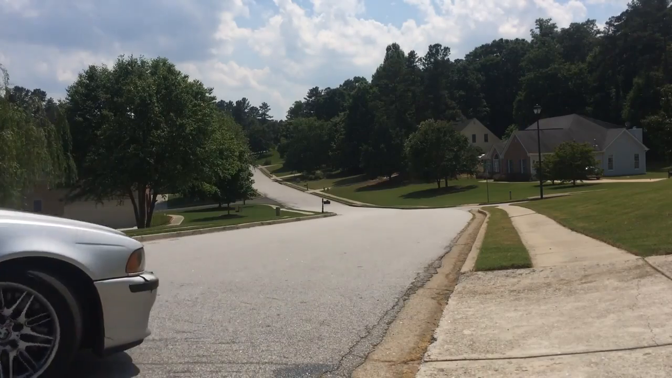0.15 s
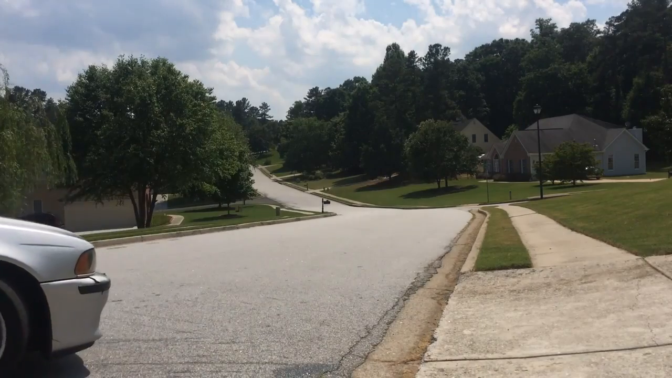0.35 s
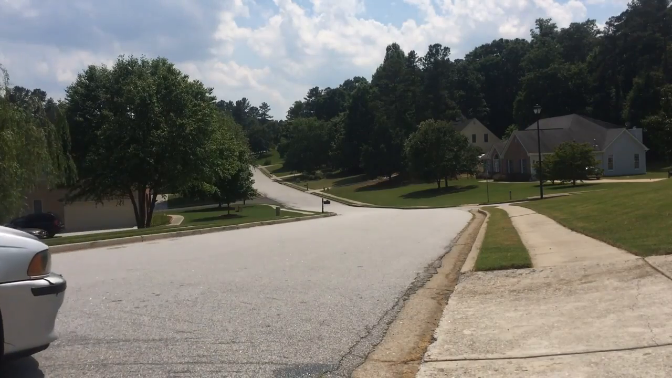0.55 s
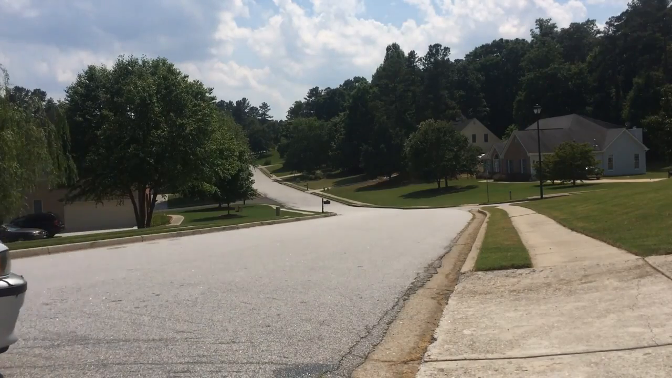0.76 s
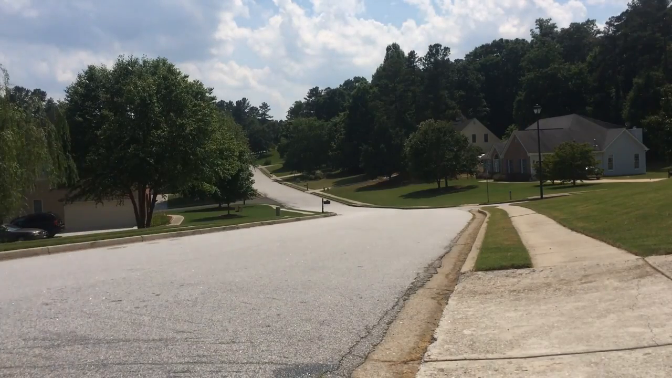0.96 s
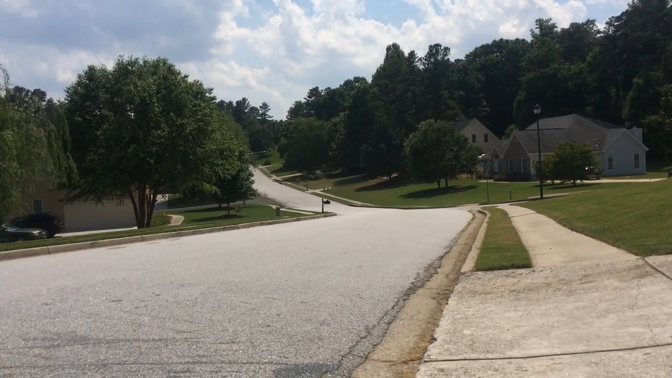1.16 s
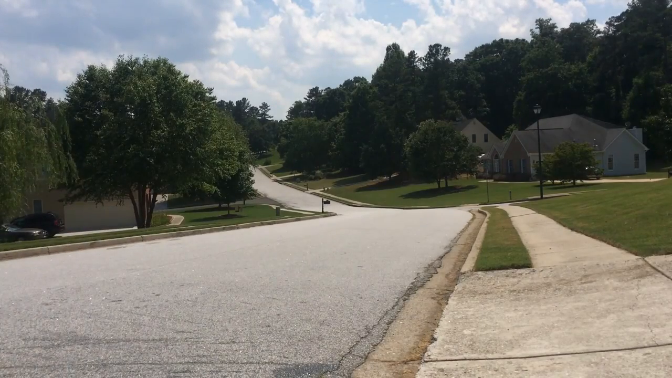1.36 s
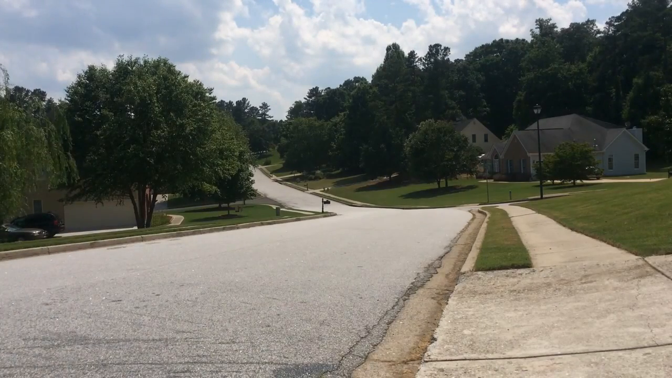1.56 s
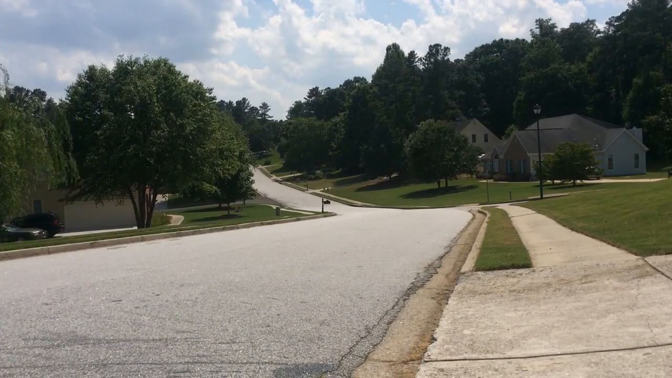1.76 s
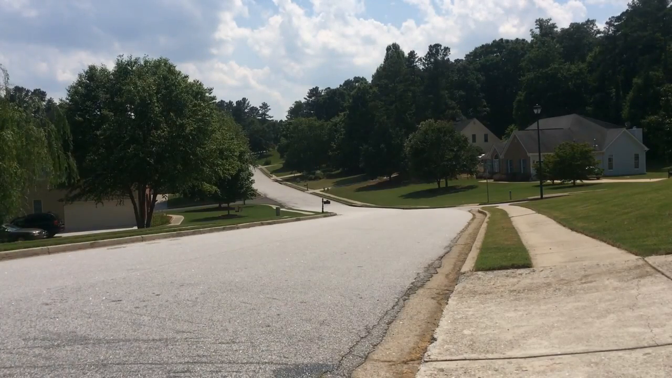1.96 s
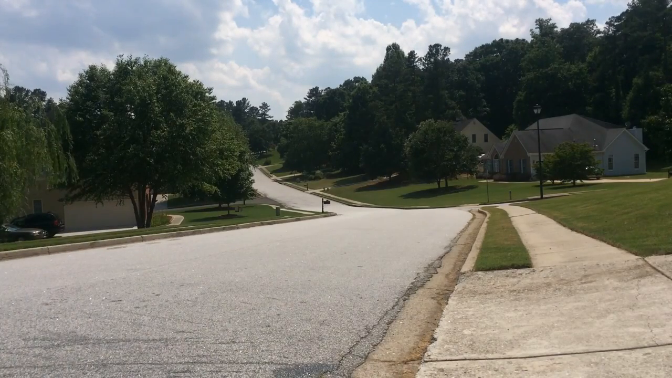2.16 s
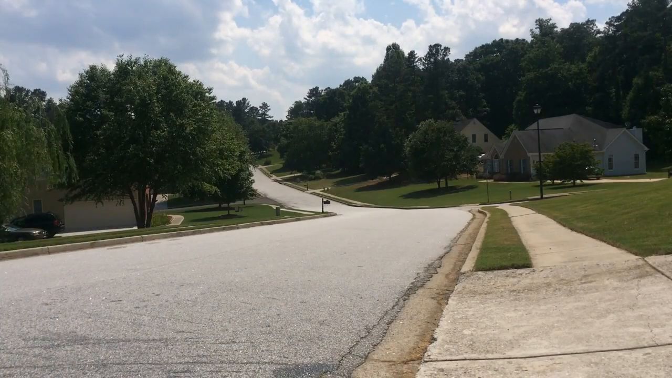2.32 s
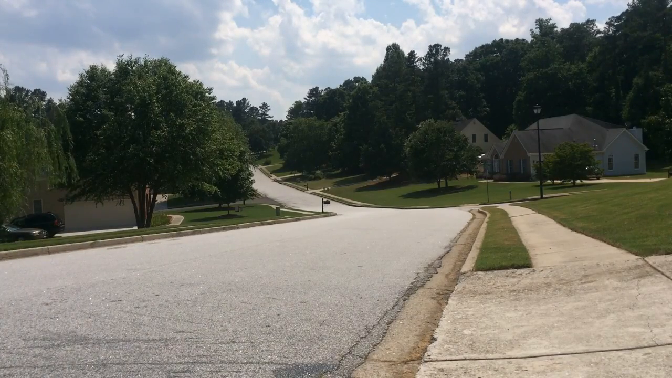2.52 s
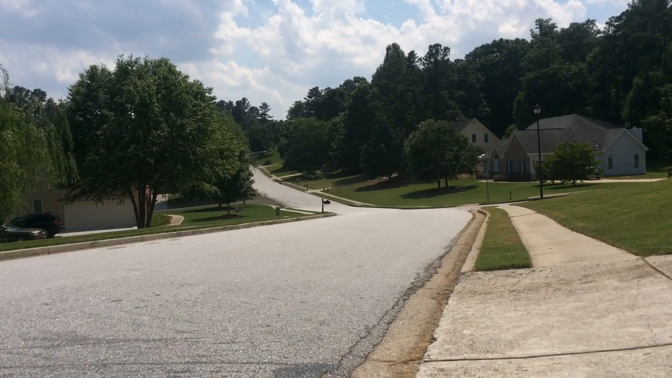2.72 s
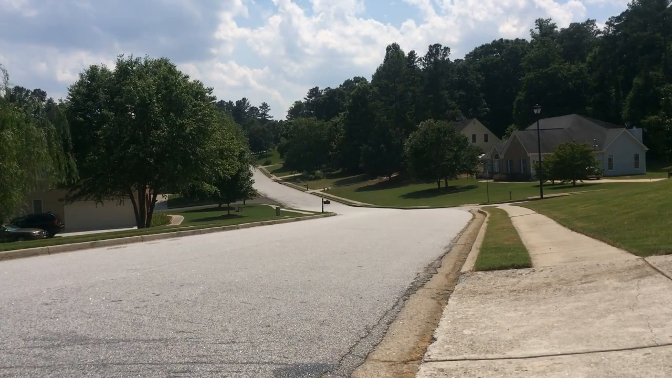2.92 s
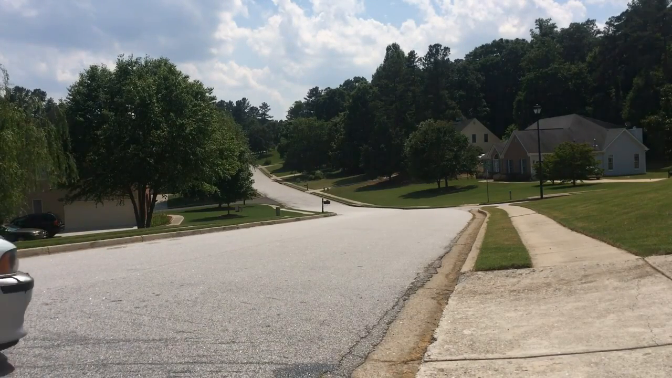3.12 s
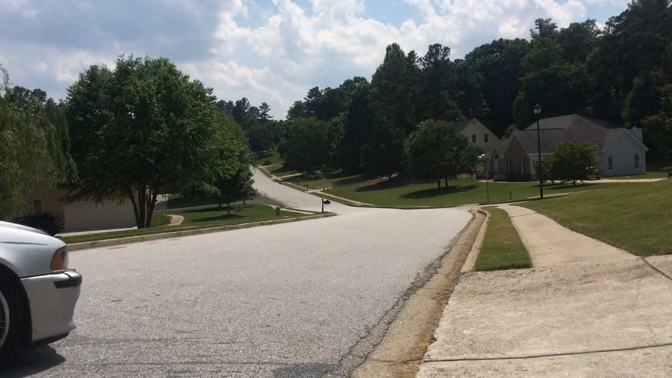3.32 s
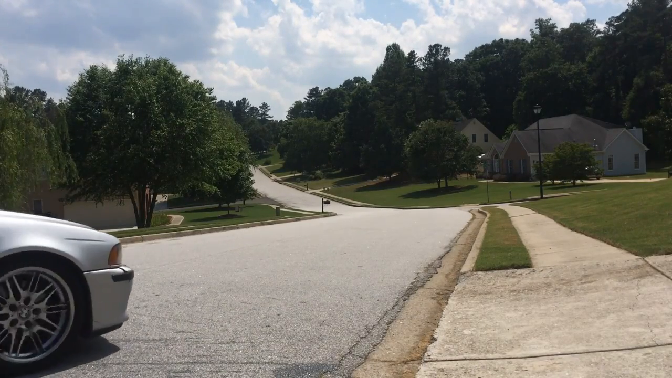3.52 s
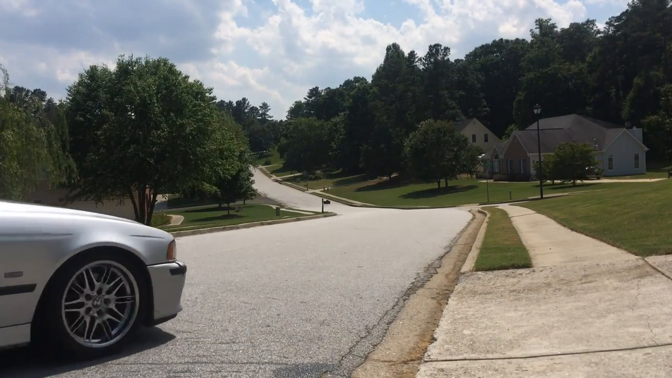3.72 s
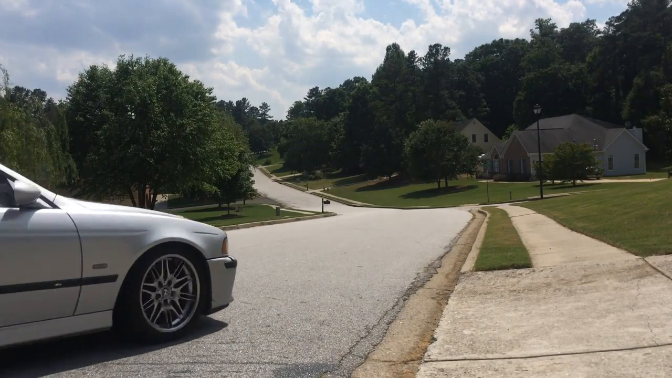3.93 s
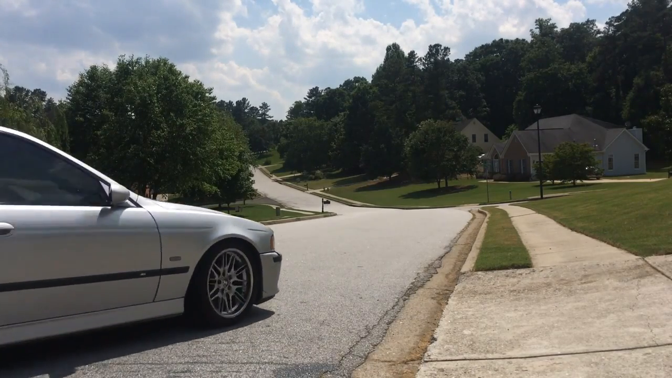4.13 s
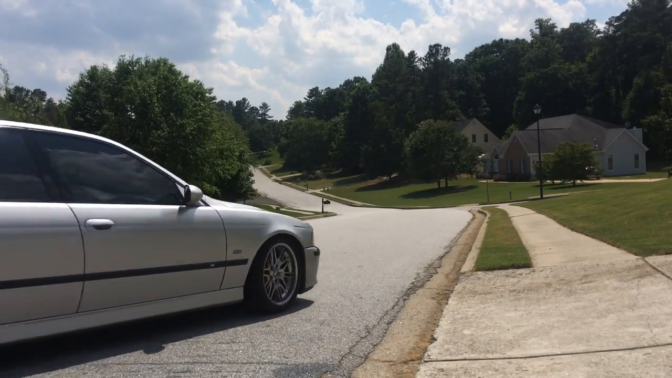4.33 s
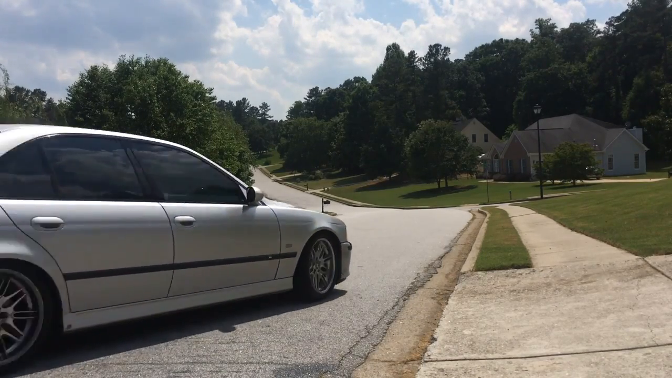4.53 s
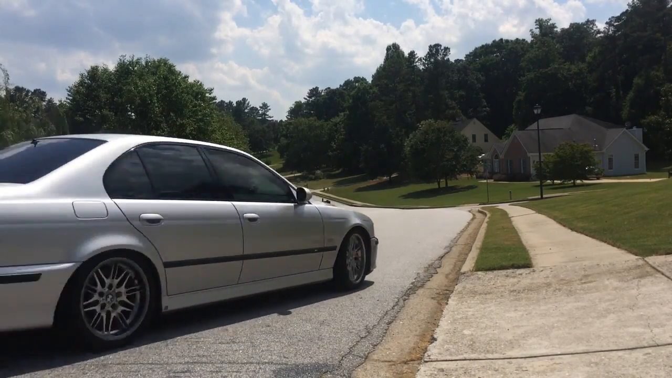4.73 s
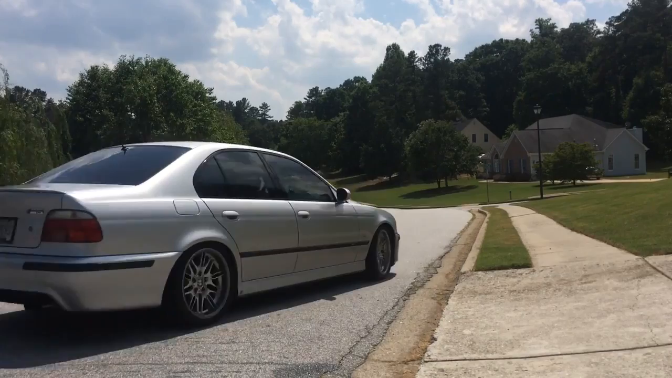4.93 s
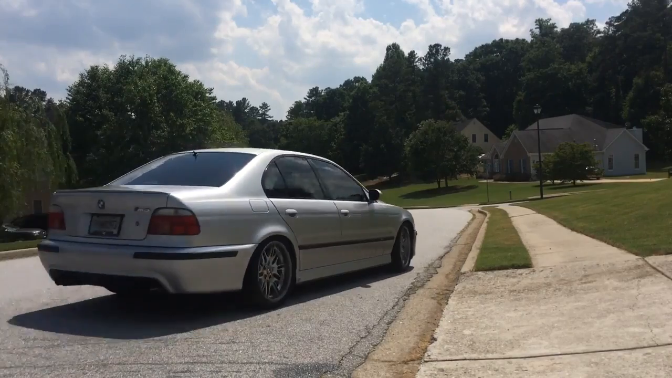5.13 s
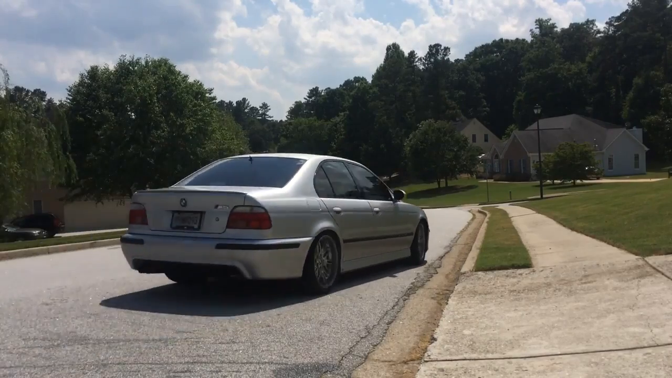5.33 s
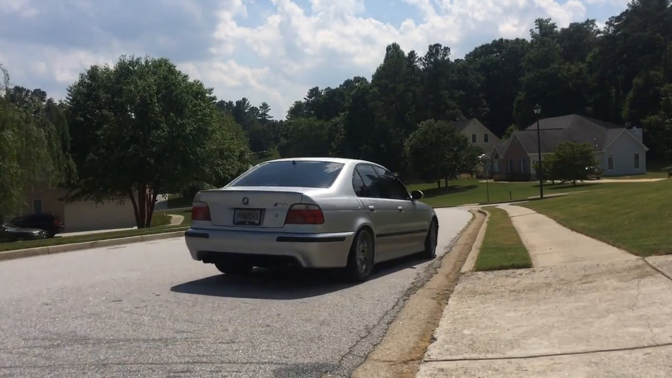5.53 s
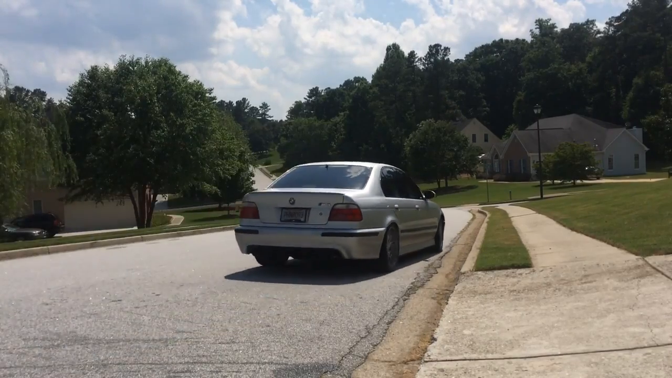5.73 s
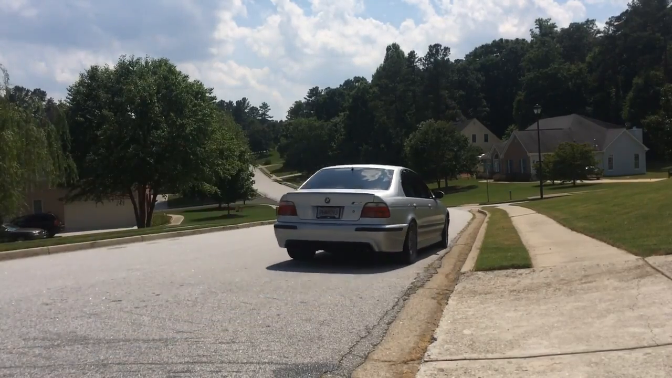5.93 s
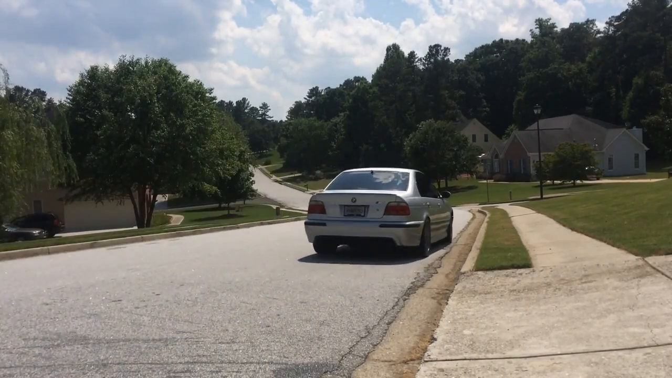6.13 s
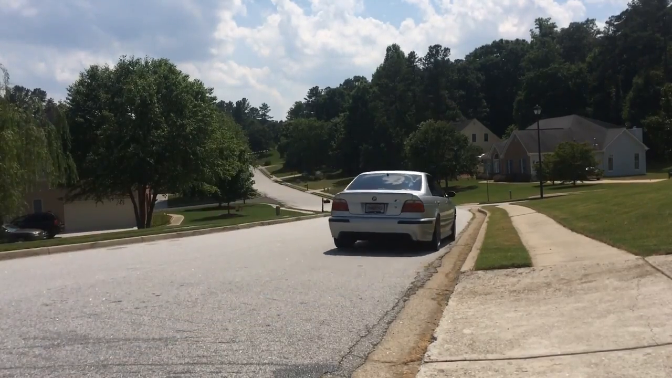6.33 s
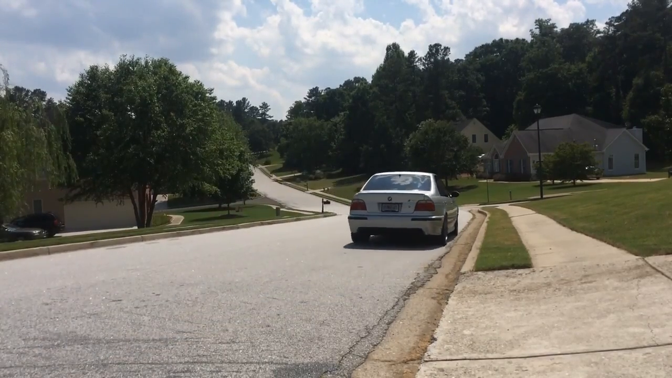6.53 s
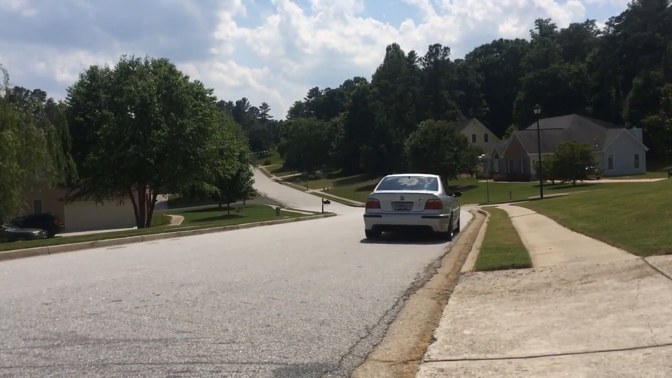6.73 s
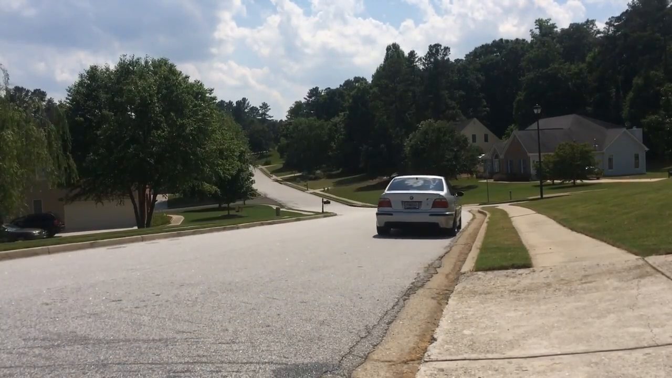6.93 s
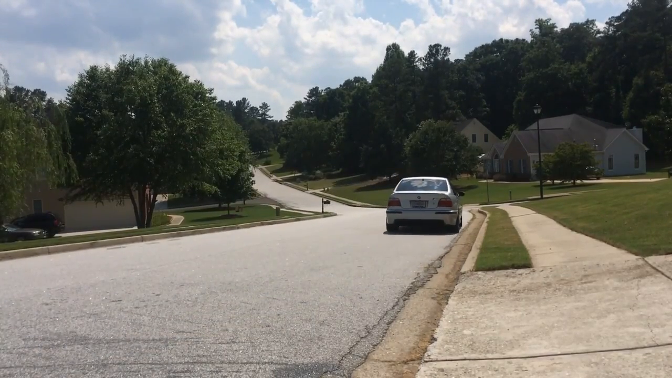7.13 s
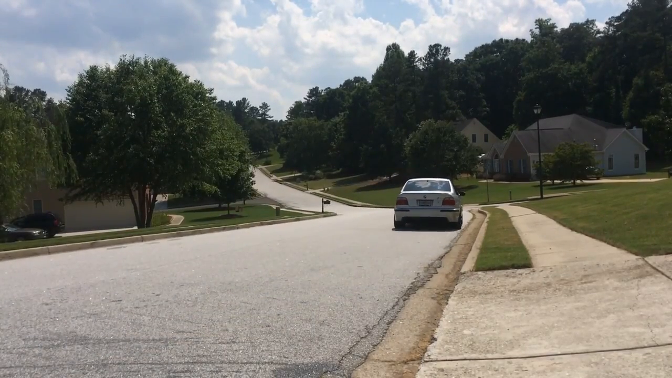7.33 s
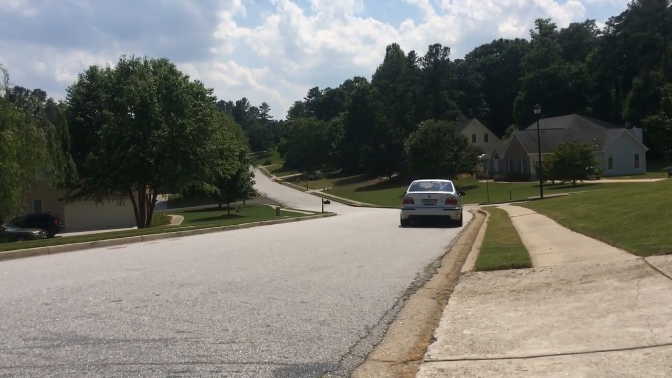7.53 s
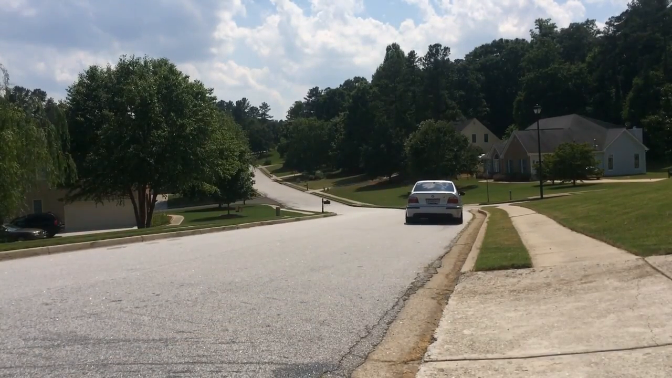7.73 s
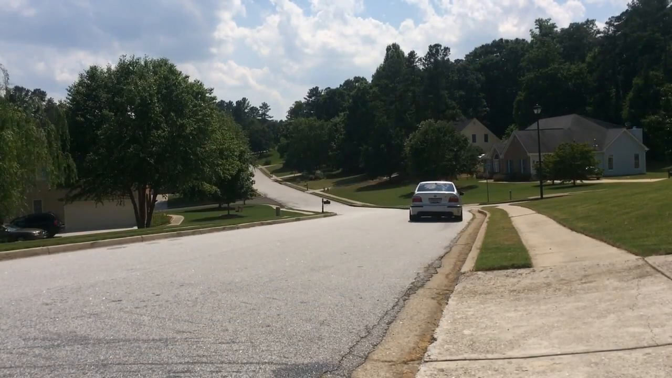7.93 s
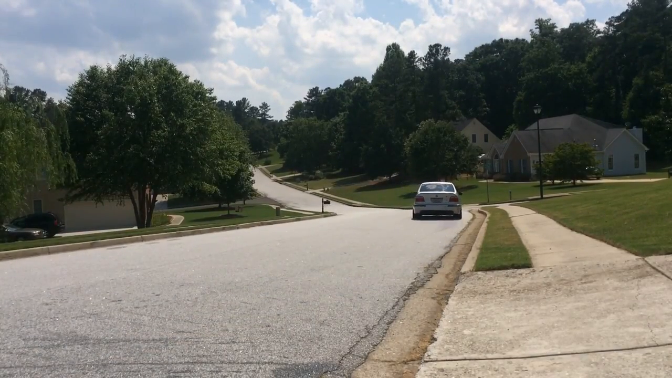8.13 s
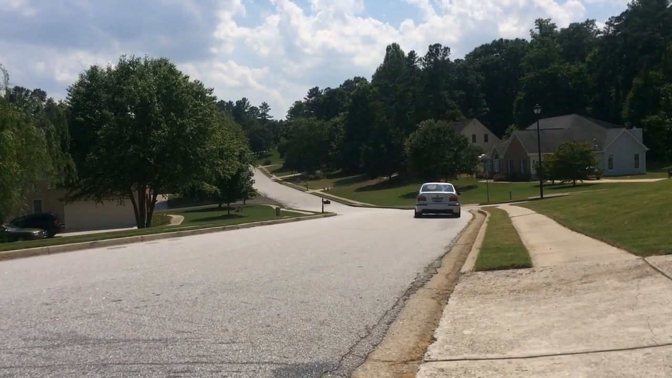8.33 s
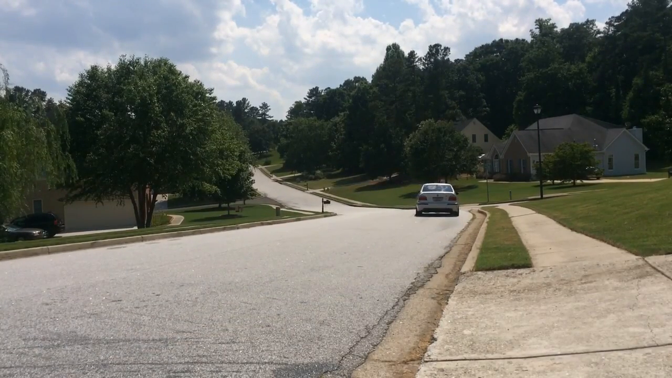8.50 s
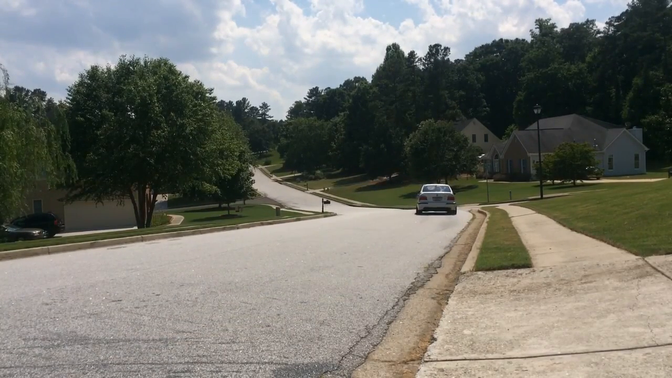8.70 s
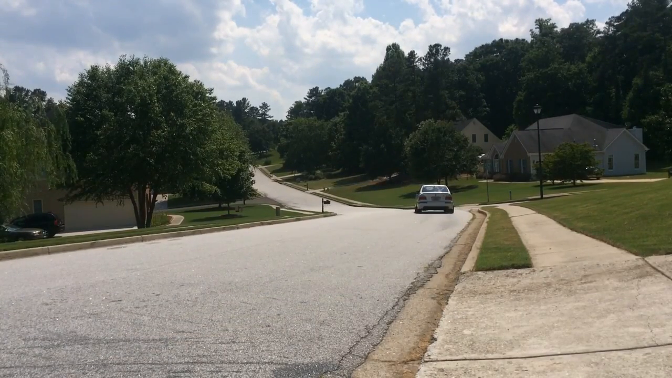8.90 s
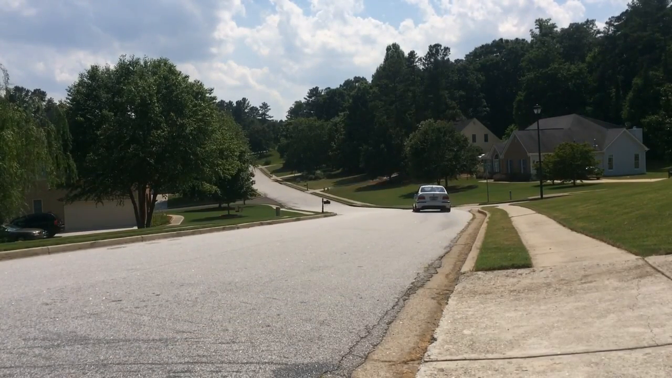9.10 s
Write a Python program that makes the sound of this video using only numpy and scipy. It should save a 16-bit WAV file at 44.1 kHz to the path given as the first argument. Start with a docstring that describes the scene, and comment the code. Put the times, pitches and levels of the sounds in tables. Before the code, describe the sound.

Close by, a V8 car fires up, idles with a low lumpy burble and ticking engine, then pulls away with a rising exhaust growl into the distance.

```python
"""A V8 saloon starts close beside the microphone on a quiet street, idles, creeps off and accelerates away.
Its firing orders sweep through the fixed resonances of the tail pipes, which turn towards the microphone
as it passes. The engine bay, of shaped noise and taps, hisses and clatters; short noise grains tick and knock.
A brake squeals faintly as a fuzzy sine, and insects buzz far off as banded noise."""
import sys
import numpy as np
from scipy import signal
from scipy.fft import rfft, irfft, next_fast_len
from scipy.io import wavfile
from scipy.ndimage import map_coordinates

SR = 44100
rng = np.random.default_rng(int(sys.argv[2]) if len(sys.argv) > 2 else 0)


def persist_wave(psi):
    """Save psi, clipped to +-1, as 16-bit WAV."""
    counts = np.round(np.clip(psi, -1, 1) * 32767).astype(np.int16)
    wavfile.write(sys.argv[1], SR, np.atleast_2d(counts).T)


N = 403944  # length in samples


def amp(db):
    """Amplitude factor of a level in dB."""
    return 10 ** (np.asarray(db) / 20)


def unit(x):
    """x scaled to rms 1."""
    return x / np.sqrt(np.mean(x ** 2) + 1e-20)


def curves(rows, step=1):
    """One value per step samples for each column after the time."""
    s, *columns = np.transpose(rows)
    t = np.arange(0, N, step) / SR
    return [np.interp(t, s, c, c[0], c[-1]) for c in columns]


def wobble(rate, count=1, step=1):
    """Random curves, rate knots a second: a single one is smooth, several are joined by straight lines."""
    at = np.arange(0, N, step) * rate / SR
    knots = rng.standard_normal((count, int(at[-1]) + 4))
    order = 3 if count == 1 else 1
    return np.array([map_coordinates(k, [at], order=order) for k in knots])


def filtered(x, response):
    """x passed through a complex response of frequency."""
    m = next_fast_len(N + SR // 2)
    return irfft(rfft(x, m) * response(np.fft.rfftfreq(m, 1 / SR)), m)[:N]


def shape(points):
    """Gain through (freq_hz, level_db) points on a log frequency axis."""
    f, db = np.transpose(points)
    return lambda hz: amp(np.interp(np.log(hz + 1), np.log(f + 1), db))


def resonant(modes, sign=-1):
    """Causal response of (freq_hz, width_hz, level_db) modes; sign 1 leaves a notch between neighbours."""
    def response(f):
        total = 0
        for k, (centre, width, db) in enumerate(modes):
            total = total + sign ** k * amp(db) * 1j * f * width / (centre ** 2 - f * f + 1j * f * width)
        return total
    return response


def noise(response, gate=1):
    """Coloured noise of rms 1, gated before its colour."""
    return unit(filtered(gate * rng.standard_normal(N), response))


def tone(hz, db):
    """A sine of moving pitch and rms level."""
    return np.sqrt(2) * amp(db) * np.sin(2 * np.pi * np.cumsum(hz) / SR)


# steady buzz in the trees, far off: [time_s, level_db]
INSECT_LEVEL = [(3, -84), (4, -61), (5.5, -61), (9.16, -66.5)]


def insects():
    """A far chorus: noise through three broad resonances, squared to steepen their sides."""
    bands = resonant([(3206, 420, 6), (4460, 650, 4.5), (6040, 1100, 1)])
    chorus = noise(lambda hz: bands(hz) ** 2)
    return amp(curves(INSECT_LEVEL)[0] + 1.1 * wobble(19)[0]) * chorus


# a brake rubs: [start_s (swell complete), hold_s, level_db]
SQUEAL = [(4.13, 0.047, -68), (4.564, 0.052, -68), (5.12, 0.25, -67), (5.72, 0.17, -76), (6.339, 0.11, -79),
          (6.9, 0.1, -83.5), (8.6, 0.047, -73)]
SQUEAL_RISE_S, SQUEAL_FADE_DB_PER_S = 0.03, 146
# pitch at 4 s; it sinks as the car draws away faster
SQUEAL_HZ, SQUEAL_SAG_HZ_PER_S, SQUEAL_WIDTH_HZ = 14040, 75, 200


def squeal():
    """A high sine made fuzzy by slow noise, in bursts that swell, hold and fade."""
    t = np.arange(N) / SR
    bursts = 0
    for start_s, hold_s, level_db in SQUEAL:
        swell = np.clip((t - start_s) / SQUEAL_RISE_S + 1, 0, 1)
        fade_db = SQUEAL_FADE_DB_PER_S * np.maximum(t - start_s - hold_s, 0)
        bursts = bursts + swell * amp(level_db - fade_db)
    fuzz = noise(lambda hz: 1 / (1 + (hz / SQUEAL_WIDTH_HZ) ** 2))
    return bursts * fuzz * tone(SQUEAL_HZ - SQUEAL_SAG_HZ_PER_S * (t - 4), 0)


# engine block and covers, rung by ticks and valve gear: [freq_hz, width_hz, level_db]
BLOCK = [(355, 47, 3.5), (546, 55, 3.5), (794, 150, -0.5), (1024, 40, 3), (1333, 35, 2.5),
         (1640, 300, -7.5), (2023, 71, -4.5), (2365, 140, -13), (2870, 91, -12), (3810, 86, -14),
         (3905, 90, -13.5), (4080, 230, -22), (6160, 330, -38.5), (7560, 400, -25.5), (8300, 170, -25)]
# knocks and ticks of car and grit, levels before colouring: [start_s, crack_db, knock_db, scuff_db]
TICKS = [(0.0345, -37, -46, -50), (0.092, -42, -53, -60), (0.116, -38, -52, -64), (0.159, -37, -49, -63),
         (0.1805, -36, -38, -64), (0.2233, -42, -33, -58), (0.2744, -55, -33, -68), (0.61, -33, -27.5, -57),
         (0.6313, -35, -39, -58), (0.953, -54, -33.5, -62), (0.974, -58, -40, -58), (1.0728, -47, -55, -61),
         (1.108, -60, -38, -65), (1.2286, -51, -39, -56), (1.6632, -56, -53, -70),
         (3.4766, -55, -28.5, -50), (3.498, -49, -36, -52), (3.967, -58, -48, -58), (4.096, -58, -50, -55),
         (4.175, -52, -54, -51.5), (4.2594, -48, -51, -54), (4.3068, -52, -39, -53), (4.327, -56, -48, -46),
         (4.338, -55, -48, -57), (4.371, -58, -55, -56), (4.435, -60, -52, -53), (4.473, -54, -47, -55),
         (4.9203, -56, -41, -54), (5.582, -46, -41.5, -61), (5.891, -49, -47, -64),
         (5.9535, -47, -55.5, -62.5), (6.6076, -52, -56, -71), (7.7327, -52, -36, -66)]
# resonances of the dull knock: [freq_hz, width_hz, level_db]
KNOCK = [(590, 87, 0), (1020, 150, 2)]
# resonances of the scuff: [freq_hz, width_hz, level_db]
SCUFF = [(2340, 700, -5), (3400, 760, -2.5), (4600, 900, -8.5)]


def ticks():
    """Each contact is a soft-edged crack that also rings the block, a duller knock and a scuff."""
    crack, knock, scuff = np.zeros((3, N + SR))
    t = np.arange(SR // 10) / SR
    rise = 1 - np.exp(-t / 0.0011)
    slow_rise = 1 - np.exp(-t / 0.0033)  # multiplies the first rise, for the scuff only
    for start_s, crack_db, knock_db, scuff_db in TICKS:
        grain = rise * rng.standard_normal((3, len(t)))
        span = slice(round(start_s * SR), round(start_s * SR) + len(t))
        # each falls 60 dB in the time under the slash
        crack[span] += amp(crack_db + 2.5 - 60 * t / 0.09) * grain[0]
        knock[span] += amp(knock_db + 16.5 - 60 * t / 0.081) * grain[1]
        scuff[span] += amp(scuff_db + 23.5 - 60 * t / 0.094) * slow_rise * grain[2]
    crack_colour = shape([(1500, -52.0), (4500, -13.5), (7000, -5.5), (11000, -10.5), (15000, -20)])
    bright = filtered(crack[:N], crack_colour)
    ringing = amp(10.0) * filtered(bright, resonant(BLOCK))
    dull = filtered(knock[:N], resonant(KNOCK)) + filtered(scuff[:N], resonant(SCUFF))
    return bright + ringing + dull


# engine bay and tyres: [time_s, roar_db, grit_db, hiss_db]
BAY = [(0, -43.5, -53, -54), (.23, -51, -54, -54.5), (.36, -45.5, -56, -61), (.56, -41, -51.5, -56),
       (1.04, -44, -54.5, -60), (1.55, -44, -54, -58.5), (2.11, -42, -50.5, -54.5),
       (3.3, -41.5, -51.5, -55.5), (3.8, -42.5, -50.5, -58), (4.1, -43.5, -54.5, -58.5),
       (4.5, -42, -49, -58), (5, -44.5, -54.5, -61.5), (5.38, -41, -54.5, -60), (6.33, -49, -66, -70.5),
       (6.84, -43, -61, -69.5), (7.5, -49, -61.5, -70.5), (8, -44, -60, -66.5), (9.16, -42.5, -56.5, -67)]
# colour of the roar: [freq_hz, density_db (per Hz)]
ROAR = [(150, -32.5), (250, -10), (400, -10), (600, -7), (1020, -10.5), (1400, -16.5), (2000, -23.5),
        (3000, -56.5), (6000, -92.5)]
# colour of the tyre grit: [freq_hz, density_db (per Hz)]
GRIT = [(900, -40.5), (1600, -6), (2050, -0.5), (2500, -3.5), (2930, -4.5), (3400, -8), (3860, -8.5),
        (4400, -15), (5600, -16.5), (9000, -61.5)]
# colour of the hiss: [freq_hz, density_db (per Hz)]
HISS = [(2500, -30.5), (4500, -13.5), (6500, -6), (7700, -7), (10000, -8), (13000, -12), (15300, -12)]
# valve gear: [time_s, level_db]
CLATTER = [(0, -60), (.22, -40), (.3, -47), (1.5, -43.5), (2, -41.5), (3.4, -42), (3.9, -48), (4.6, -50),
           (5.6, -66.5), (9.16, -71)]
# a steady pump tone: [time_s, pitch_hz, level_db]
PUMP = [(0, 312, -54), (.5, 312, -50), (1.5, 312, -50), (2.3, 318, -51), (3.3, 318, -52), (3.8, 316, -70)]


def bay(firing):
    """Roar and tyre grit pulse with the firings, hiss ticks each cycle, taps ring the block, a pump hums."""
    roar_db, grit_db, hiss_db = curves(BAY)
    pulse = 1 + 0.35 * np.exp(-4 * (firing % 1)) * amp(7.9 * np.tanh(wobble(40)[0]))
    cycle_tick = 0.63 * np.exp(-14 * (firing / 8 % 1))  # one valve a cycle of eight firings
    tick = 1 + cycle_tick + 0.16 * np.exp(-6 * (firing / 2 % 1))
    own = wobble(8.3, count=3)
    roar = amp(roar_db + 0.58 * own[0]) * noise(shape(ROAR), pulse)
    grit = amp(grit_db + 0.95 * own[1]) * noise(shape(GRIT), pulse)
    hiss = amp(hiss_db + 0.82 * own[2]) * noise(shape(HISS), tick)
    hits = rng.random(N) < 500 / SR  # about 500 taps a second
    taps = hits * rng.standard_normal(N) * amp(5 * np.tanh(wobble(45)[0]))
    clatter = amp(curves(CLATTER)[0]) * unit(filtered(taps, resonant(BLOCK)))
    pump = amp(2 * own[0]) * tone(*curves(PUMP))
    return roar + grit + hiss + clatter + pump


# first firings, then a low rumble that stays: [time_s, boom_hz, boom_db, thud_db]
CATCH = [(0, 76.8, -26, -31.5), (.09, 80.8, -23.5, -29.5), (.17, 88, -19, -30), (.23, 95.5, -22, -24),
         (.3, 104.2, -40, -32), (.355, 103.6, -42, -32), (.39, 105.5, -65, -48), (.5, 107, -86.5, -44.5),
         (1.5, 104, -89, -38), (5.6, 105.1, -89.5, -41.5), (6.3, 104.7, -91.5, -44.5),
         (7.2, 106.4, -84, -49.5), (9.16, 107.6, -87.5, -44.5)]


def start():
    """The first charges boom as a sine and thud as low noise; a low rumble stays on."""
    boom_hz, boom_db, thud_db = curves(CATCH)
    thud_colour = shape([(20, -12.0), (50, -14), (80, -2.0), (110, 0.5), (170, -0.5), (210, -11.5),
                         (400, -50.5), (2000, -76.0)])
    thud = amp(thud_db + 4.6 * np.tanh(wobble(45)[0])) * noise(thud_colour)
    return tone(boom_hz, boom_db + 2.0 * wobble(30)[0]) + thud


# clutch slip hum: [time_s, pitch_hz, level_db]
CLUTCH = [(4.55, 70, -90), (4.62, 89.7, -59), (4.72, 69, -45), (4.9, 42, -36), (5.1, 31, -45),
          (5.25, 22.6, -35), (5.4, 18.6, -82)]


def clutch():
    """A hum whose pitch sinks as the clutch slip closes."""
    return tone(*curves(CLUTCH))


# one cylinder barks under load, level before the pipes: [start_s, level_db]
BARKS = [(5.127, -20), (5.355, -13.5), (5.427, -16), (5.496, -17.5), (5.566, -15)]
BARK_S = 0.00081  # time from the start of the pressure step to its peak


def barks():
    """Single heavy charges entering the pipes, each a pressure step that rises and decays."""
    t = np.arange(N) / SR
    total = 0
    for start_s, level_db in BARKS:
        age = np.clip(t - start_s, 0, 1) / BARK_S
        total = total + amp(level_db) * (t > start_s) * age * np.exp(1 - age)
    return -amp(18) * total


# single heavy or weak thumps of the uneven idle and at moving off:
# [time_s, level_db (over the running level)]
HEAVY = [(1.93, 1.5), (2.044, 6), (2.153, 5.5), (2.2, 1.5), (2.27, -4.5), (2.321, 6), (2.365, 5.5),
         (2.482, -3), (2.532, 6.5), (2.578, 5.5), (2.682, 6.5), (2.742, 2), (3.058, 1), (3.111, 2),
         (3.235, -3), (3.348, 5.5), (3.46, 4.5), (3.681, 2), (4.048, 3.5), (4.154, 3.5)]
HEAVY_S = 0.0077  # half length of a thump


def thumps():
    """Gain that lifts or drops single thumps, a bell curve for each."""
    ms = np.arange(0, N / SR, 1 / 1000)
    level_db = sum(db * np.exp(-((ms - s) / HEAVY_S) ** 2) for s, db in HEAVY)
    return amp(np.interp(np.arange(N) / SR, ms, level_db))


# steady multiples of the firing rate; only whole multiples are heard from the side:
# [multiple, side_db, pipe_db (at 100 firings a second), pipe_slope_db (per octave of speed)]
STRONG = [(1, 9.5, 1, 2), (1.25, 0, -18.5, 13), (2, -8.5, 3.5, -1), (3, 11.5, -5, 0.5),
          (4, 0.5, -9.5, -5.5)]
# overtones swell and sink as the car turns and the road reflection shifts:
# [time_s, second_multiple_db, third_multiple_db, fourth_multiple_db]
TURNING = [(0, 3, -0.5, 0), (2, -14, -5.5, 0.5), (3.4, -11.5, 2, -2.5), (4.3, 1, -5, 0.5),
           (4.8, 12, 3, 2.5), (5.2, -7.5, -4.5, -3), (5.5, -4.5, -2.5, -9), (5.75, 0, 3, -7),
           (6.05, 2, -8, -7.5), (6.299, 0.5, 3, 0.5), (6.7, 9.5, -4, 9), (7.1, -4, 1.5, -0.5),
           (7.5, -1.5, 5, -1.5), (8.2, -2, -7.5, -2), (9.16, 1.5, -10, -2)]


def strong_orders(fire_hz, lumps_db):
    """Sines at the strong multiples of the firing rate; the higher ones swell and sink with the turning."""
    steady = [tone(m * fire_hz, lumps_db / m) for m, *_ in STRONG]
    turned = [amp(db) * x for db, x in zip(curves(TURNING), steady[2:])]
    return steady[:2] + turned


# weaker orders of the four-stroke cycle from the side, eight to a firing, strong ones skipped: [level_db]
ORDER_DB = [-29.5, -18, -21, -10, -9, -10, -12.5, -16.5, -18.5, -3.5, -15, -2.5, -6, -14.5, -0.5, -8, -19.5,
            -4, 1.5, 3, -9.5, 1, -7, -8, -8.5, -2, -24]
# the same orders as they enter the pipe filters: [level_db]
ORDER_PIPE_DB = [-37, -26, -25.5, -20, -21, -17, -11.5, -11, -7, -19, -14, -5, -16.5, -13.5, -3, -11, -14,
                 -12, -5.5, -11, -13.5, -8.5, -15.5, -14, -16.5, -7.5, -25]
# the pattern that repeats above the fourth firing order, before a steady slope: [level_db]
UPPER_DB = [-15.5, -10.5, -14.5, -17.5, -11.5, -11, -11.5, -11]
WAVER_DB, WAVER_DB_PER_ORDER = 2.1, 0.02  # higher orders are patchier
DRIFT = 0.35  # radians; the orders slide slowly against each other, so the throb is uneven
BLUR = 0.013  # radians per order at 100 firings a second, less at speed: timing wander of the charges


def weak_orders(fire_hz):
    """Orders of the eight-firing cycle, summed at a tenth of the rate for the side and for the pipes."""
    step = 10
    low_hz = fire_hz[::step]
    cycle = 2 * np.pi * np.cumsum(low_hz / 8) * step / SR
    strong = np.round(8 * np.array(STRONG)[:, 0])
    k = np.setdiff1d(np.arange(1, 65), strong)[:, None]
    fade = np.clip((1800 - k * low_hz / 8) / 200, 0, 1)  # orders fade out from 1600 to 1800 Hz
    slow = wobble(3.3, count=len(k), step=step)
    size = fade * amp((WAVER_DB + WAVER_DB_PER_ORDER * k) * slow)
    phase = 0.85 * rng.standard_normal(k.shape)  # nearly aligned: one cylinder barks louder each cycle
    wander = BLUR * k * 100 / low_hz * wobble(14, step=step)
    waves = size * np.cos(k * cycle + phase + DRIFT * slow[::-1] + wander)
    upper_db = np.tile(UPPER_DB, 4) - 0.52 * np.arange(32)
    mixes = [amp(np.r_[db, upper_db]) @ waves for db in (ORDER_DB, ORDER_PIPE_DB)]
    return [signal.resample_poly(mix, step, 1)[:N] for mix in mixes]


# one stronger beat a crank turn: [multiple (of the firing rate), level_db (before the burble curve)]
BURBLE = [(.25, -7.5), (.5, -12.5), (.75, -11), (1.25, 1.5), (1.5, -14), (1.75, -11.5), (2.25, -5.5),
          (2.75, -5)]
BURBLE_SCATTER_DB = 1.5  # from turn to turn


def burble(fire_hz, burble_db):
    """Uneven banks: sines at quarter multiples of the firing rate under one scattered level."""
    beat = sum(tone(m * fire_hz, db) for m, db in BURBLE)
    return amp(burble_db + BURBLE_SCATTER_DB * wobble(16)[0]) * beat


# lower pipe modes: [freq_hz, width_hz, level_db]
PIPE = [(170.1, 13.8, -7.5), (287.25, 14, 4), (386.6, 24.1, 1.5)]
# upper pipe modes: [freq_hz, width_hz, level_db]
PIPE_TOP = [(514.5, 28.8, -3.5), (646.8, 23, -6), (816, 31, -11), (968, 51, -16), (1049, 37, -18.5)]
PIPE_ROLL_HZ = 770  # the pipes lose their highs above
# changes down the pipes: [time_s, upper_modes_db, weaker_orders_db]
BRIGHT = [(0, -6, 4), (2, -25, 5.5), (3.8, 16, -9), (4.6, -4, 8), (4.9, -3, -0.5), (5.2, 7.5, -4),
          (5.45, 8, -7), (5.7, 1.5, -3.5), (6, 3, -4), (6.3, 6, -0.5), (6.7, 4.5, 2.5), (7.2, 1.5, 3),
          (7.6, -1.5, 6.5), (7.95, 2.5, 2.5), (8.3, -2.5, 5.5), (8.7, -2, -0.5), (9.16, -6, 2)]
# combustion scatter down the pipes: [time_s, level_db (within the weaker orders)]
ROUGH = [(0, -7), (4.2, -7), (4.6, -8), (5.5, -7), (6, -10), (7, -12), (9.16, -14)]


def tail_pipes(pipe_db, octaves, steady, piped, puffs):
    """Orders, scatter and barks lose their highs and ring the fixed lower and upper pipe modes."""
    top_db, uneven_db = curves(BRIGHT)
    strong = sum(amp(db + slope * octaves) * x for x, (_, _, db, slope) in zip(steady, STRONG))
    weak = amp(uneven_db) * (piped + amp(curves(ROUGH)[0]) * puffs)
    behind = amp(pipe_db) * (strong + weak) + barks()
    behind = filtered(behind, lambda hz: 1 / (1 + 1j * hz / PIPE_ROLL_HZ) ** 2)
    lower = filtered(behind, resonant(PIPE, sign=+1))
    return lower + filtered(amp(top_db) * behind, resonant(PIPE_TOP, sign=+1))


# engine, levels before body and pipes; burble is of uneven banks:
# [time_s, firing_hz, side_db, pipe_db, burble_db]
ENGINE = [(0, 50.25, -44.5, -46, -34), (.2, 54.26, -35, -56, -36.5), (.38, 61.65, -41, -50, -50),
          (.5, 64.77, -46, -59, -54.5), (1, 51.57, -50, -45, -54.5), (1.55, 50.07, -53.5, -54, -69),
          (1.7, 54.37, -37, -46, -63.5), (1.9, 69.55, -36.5, -49, -42.5), (2.1, 73.84, -44.5, -55, -39.5),
          (2.35, 75.64, -43, -41.5, -39.5), (2.65, 75.2, -40.5, -41, -37.5), (2.9, 73.5, -36.5, -43, -41.5),
          (3.1, 72.67, -37, -41, -41), (3.3, 72.23, -36.5, -34, -34), (3.9, 67.16, -31.5, -32.5, -42.5),
          (4.1, 67.5, -32, -27.5, -35.5), (4.3, 77.55, -31.5, -31, -41), (4.54, 86.2, -36.5, -29.5, -29.5),
          (4.66, 90.1, -31.5, -25.5, -33), (4.88, 98.6, -30.5, -19.5, -40.5),
          (5.12, 106.4, -31.5, -19.5, -35.5), (5.36, 112.1, -28, -21.5, -26.5),
          (5.66, 123.6, -30, -17, -42.5), (5.94, 130.5, -33.5, -15, -49), (6.2, 141.7, -42, -16, -49),
          (6.42, 147.9, -43.5, -21, -49), (6.66, 158.6, -42.5, -20, -54), (7.02, 173.4, -38, -20, -50),
          (7.3, 187.1, -42, -18.5, -57), (7.62, 201.3, -38.5, -20.5, -46.5), (7.95, 214, -38.5, -20, -41),
          (8.34, 233.3, -41, -22.5, -37), (8.75, 247.5, -50.5, -16, -44.5), (9.16, 262, -47.5, -18.5, -42)]
# exhaust heard from the side, through the body: [freq_hz, level_db]
SIDE_PANEL = [(20, -12), (50, -0.5), (90, 1.5), (160, -8), (220, -18), (300, -9), (450, -9), (800, -26.5),
              (1500, -57)]
# a hum at three quarters of the firing rate under load: [time_s, level_db]
UNDERTONE = [(4.3, -71), (4.8, -49), (5.2, -43.5), (5.7, -32.5), (6.2, -35.5), (6.8, -39.5), (7.5, -54),
             (7.9, -46.5), (8.3, -31.5), (8.8, -43), (9.16, -42)]
HUNT = 0.003  # share by which the speed hunts at 100 firings a second, much less at speed
LUMP_DB, LUMP_FALL = 1.2, 0.24  # runs of strong and weak charges; they shrink as this power of speed
SIDE_WEAK_DB, SIDE_WEAK_DB_PER_OCTAVE = 1.5, -0.5  # weaker orders from the side, and their change with speed
ROUGH_SIDE_DB = 0  # combustion scatter from the side


def engine():
    """Cycle orders and combustion scatter, heard through the body from the side and down the pipes."""
    fire_hz, side_db, pipe_db, burble_db = curves(ENGINE)
    fire_hz = fire_hz * (1 + HUNT * (100 / fire_hz) ** 2 * wobble(9)[0])
    firing = np.cumsum(fire_hz) / SR  # firings so far
    octaves = np.log2(fire_hz / 100)
    orders, piped = weak_orders(fire_hz)
    # no two charges burn alike
    puffs = unit(noise(lambda hz: hz < 1800) * np.exp(-2.5 * (firing % 1)))
    # strong and weak charges come in runs
    lumps_db = LUMP_DB * 2 ** (-LUMP_FALL * octaves) * np.tanh(wobble(20)[0])
    steady = strong_orders(fire_hz, lumps_db)
    strong = sum(amp(db) * x for x, (m, db, *_) in zip(steady, STRONG) if m % 1 == 0)
    weak_gain = amp(SIDE_WEAK_DB + SIDE_WEAK_DB_PER_OCTAVE * octaves + lumps_db)
    side = amp(side_db) * (strong + weak_gain * (orders + amp(ROUGH_SIDE_DB) * puffs))
    side = side + burble(fire_hz, burble_db)
    body = filtered(thumps() * side, shape(SIDE_PANEL))
    pipes = tail_pipes(pipe_db, octaves, steady, piped, puffs)
    hum = tone(3 / 4 * fire_hz, curves(UNDERTONE)[0])
    return hum - pipes - body, firing


def scene():
    """The car close by with the far insects, in one channel; the firings also pace the engine bay."""
    exhaust, firing = engine()
    return (insects() + squeal() + ticks() + bay(firing) + start() + clutch() + exhaust)[None]


TOP_HZ = 15250  # band limit of the microphone


def record(dry):
    """The microphone keeps almost nothing above its band limit: a steep low-pass run both ways."""
    return signal.sosfiltfilt(signal.ellip(10, 0.1, 60, TOP_HZ, fs=SR, output="sos"), dry)


dry = scene()
out = record(dry)
persist_wave(out)
```